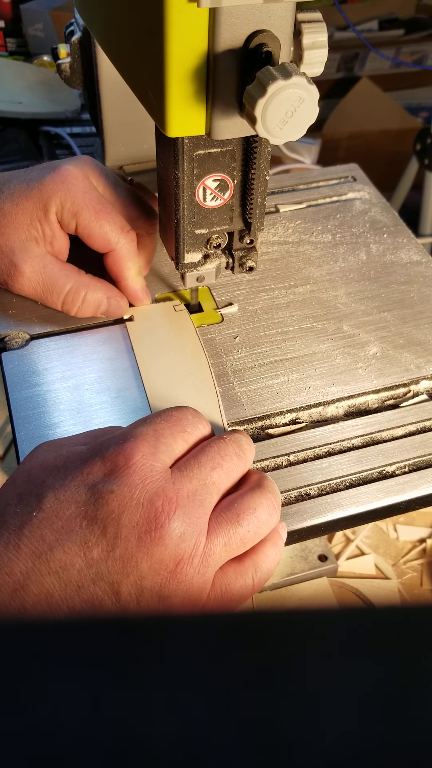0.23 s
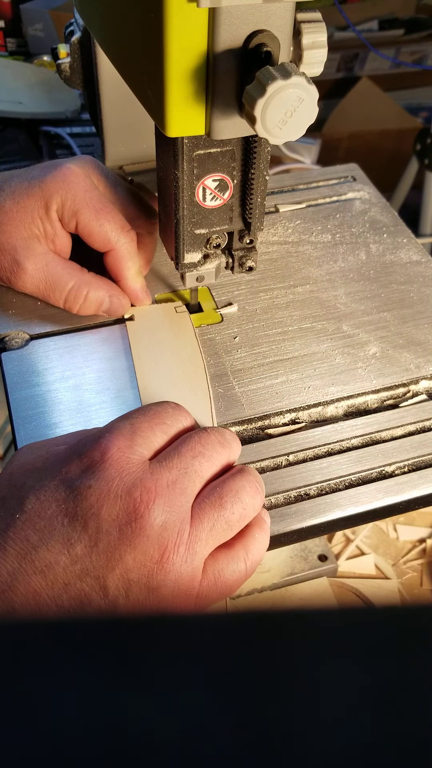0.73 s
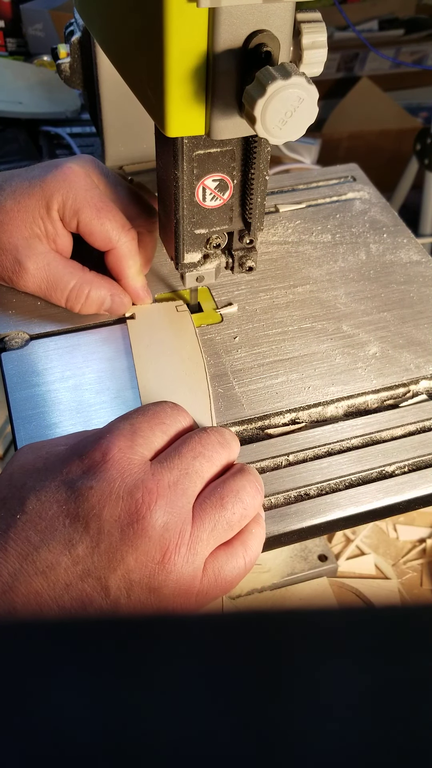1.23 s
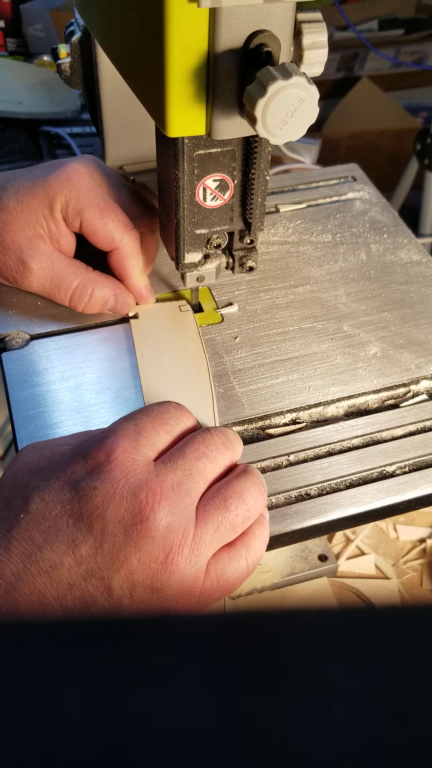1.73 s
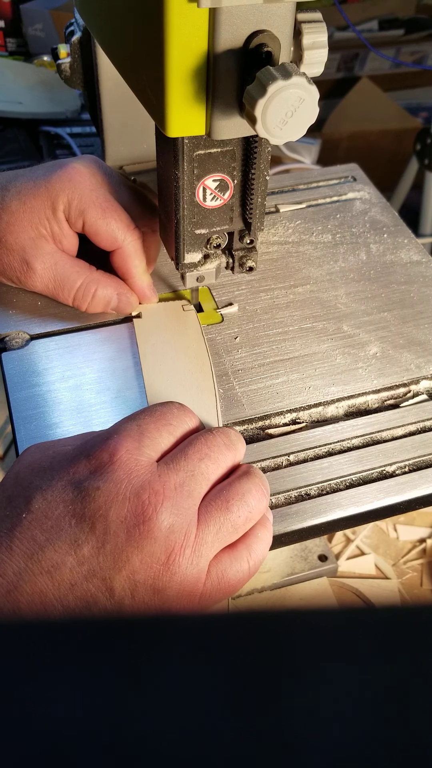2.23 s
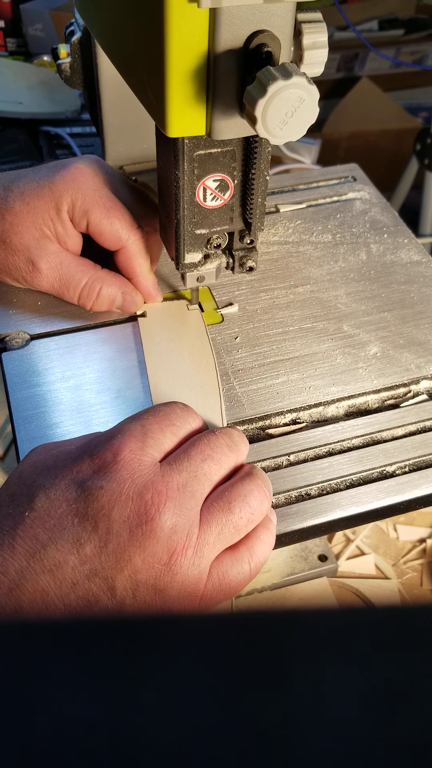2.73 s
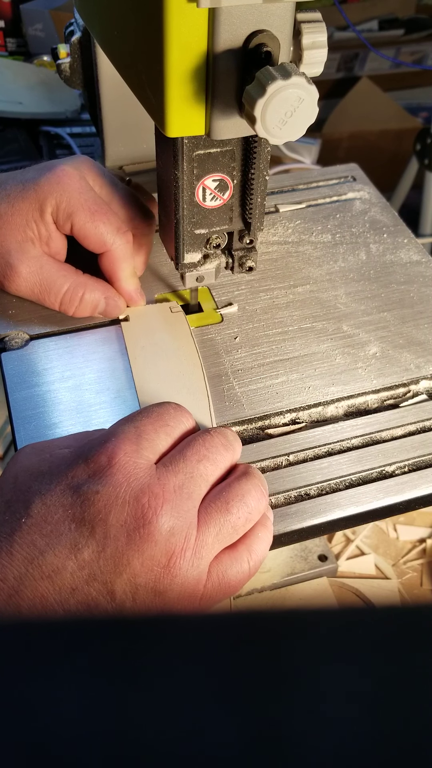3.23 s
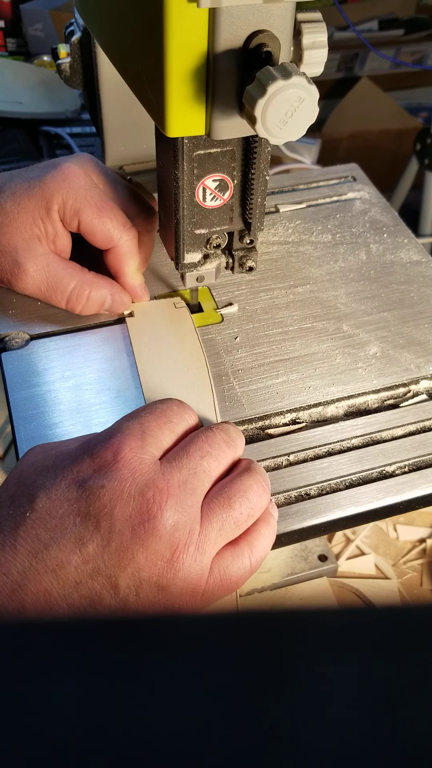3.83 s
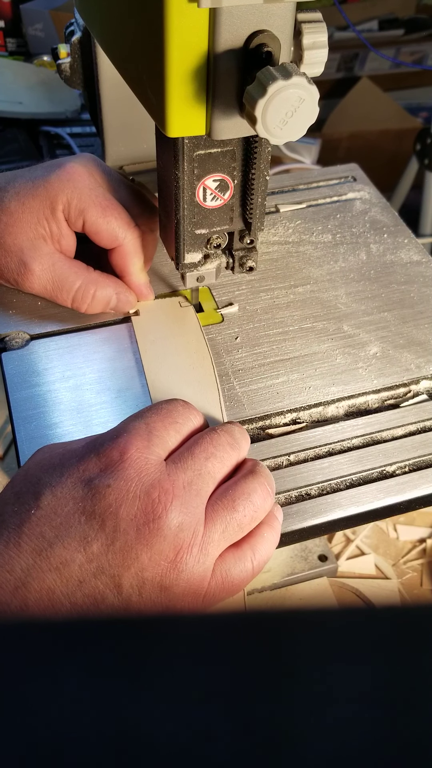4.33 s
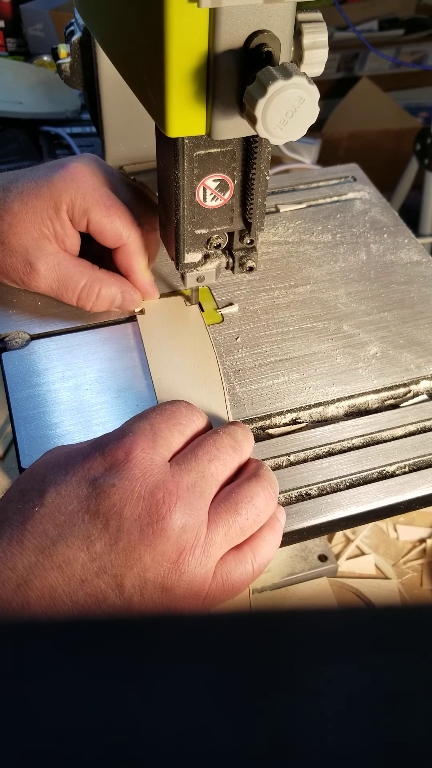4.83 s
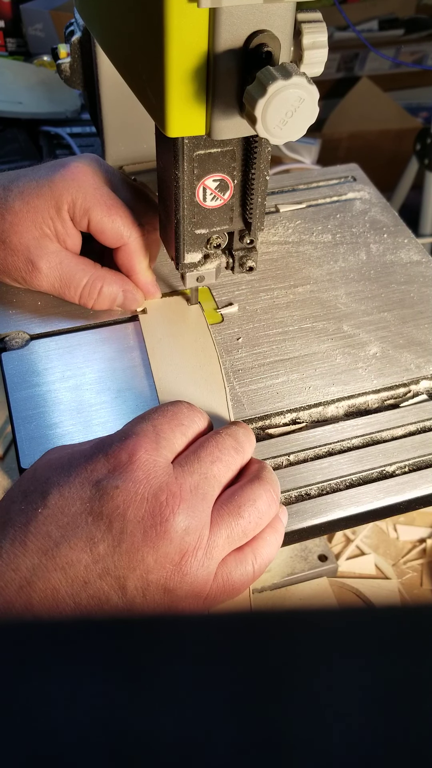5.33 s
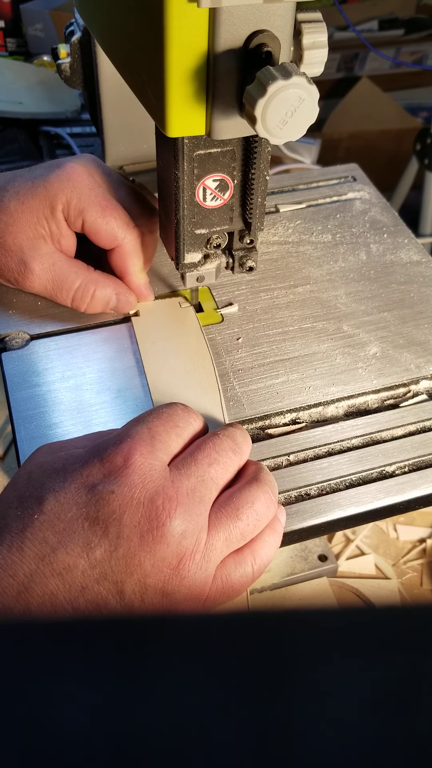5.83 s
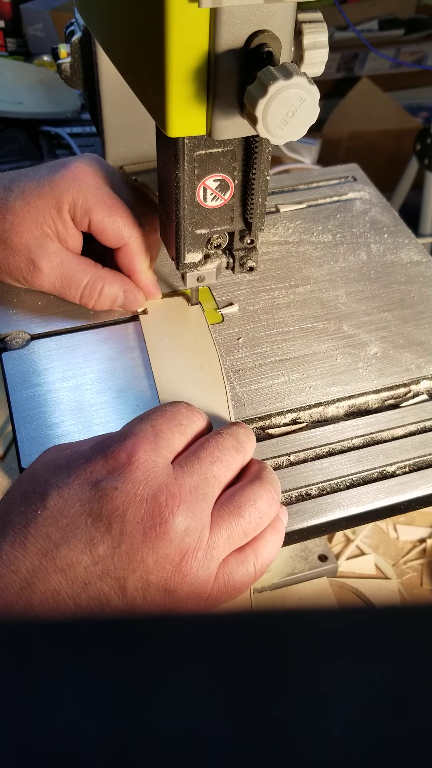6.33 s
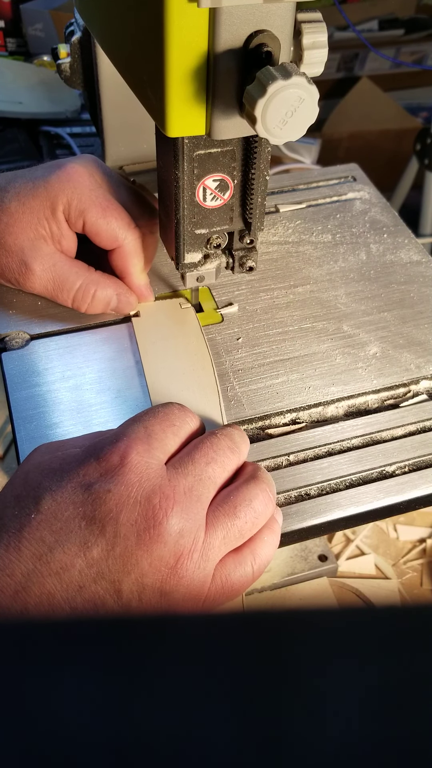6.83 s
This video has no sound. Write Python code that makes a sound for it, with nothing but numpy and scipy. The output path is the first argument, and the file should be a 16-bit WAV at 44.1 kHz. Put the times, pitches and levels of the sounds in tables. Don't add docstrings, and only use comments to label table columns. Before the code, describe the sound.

Benchtop bandsaw idling, with five harsh, buzzing cuts into plywood, dry splinter cracks and light bumps, heard close in a small workshop.

```python
import sys
import numpy as np
from scipy import signal
from scipy.fft import rfft, irfft
from scipy.io import wavfile
from scipy.ndimage import uniform_filter1d

SR = 44100
rng = np.random.default_rng(int(sys.argv[2]) if len(sys.argv) > 2 else 0)


def attenuation_scalar(level_db):
    decades = np.asarray(level_db, float) / 20
    return 10 ** decades


def transcribe(u):
    v = np.clip(np.atleast_2d(u).T, -1, 1)
    q = np.round(v * 32767).astype(np.int16)
    wavfile.write(sys.argv[1], SR, q)


N = 311787
TIME, HZ = np.arange(N) / SR, np.fft.rfftfreq(N, 1 / SR)
BELT_HZ, ROLLER_HZ, TOOTH_HZ = 8.526, 24.52, 2965
LEAD_SAMPLES = 5

# frequency_hz, left_db, right_db
EDGE = [(1260, -16, -23), (1900, -13.5, -28), (2987, 0.5, 3), (3210, -5, -13), (4400, -12.5, -5.5),
        (4850, -8.5, -30.5), (6090, -20.5, -2.5), (7020, -10.5, -15), (7760, -16, -40), (9250, -21.5, -28),
        (11530, -12, -25), (11300, -44, -6), (14700, -3.5, -10), (15300, -37, -12.5)]
CORNER = [(1090, -8, -16), (2080, -4, -16), (2940, 7.5, 6.5), (3550, -1, -3.5), (4450, -10.5, -6),
          (4350, 0.5, 0.5), (5700, -23, -11.5), (7030, -13.5, -10.5), (7700, -12.5, -53),
          (10100, -12.5, -13.5), (11400, -4.5, -15), (11920, -24, 3.5), (13500, -22, -5.5),
          (14300, -1, -11), (14970, -25, -6.5), (15700, -30, -10.5)]
SIDEWAYS = [(1200, -4.5, -12), (1930, -5, -15.5), (2800, 8, 5), (3570, 2, 0), (4200, -0.5, -1),
            (4700, -18, 0.5), (5800, -2, -3), (7000, -3, 1.5), (7900, 4.5, -35), (9550, -17, -9),
            (11300, -8, -20), (11960, -18, 1.5), (13200, -26, -8), (13900, -2, -16), (14800, -27, -9)]
FRESH = [(1220, -16.5, -25), (1910, -14, -23), (2900, -1, -1.5), (3280, 1, -3), (3760, -11.5, -14),
         (4540, -11, -5), (6150, -7, -3.5), (7100, -6.5, -6), (8050, -3, -36), (9450, -10.5, -13),
         (11100, -10, -20), (11900, -14, 0.5), (13100, -26, -12), (13900, -26, -14), (14900, -24, -11)]


def evened(x):
    return x / np.sqrt(np.mean(x ** 2) + 1e-20)


def read(points, hz, axis=1):
    points = np.array(points)
    return np.interp(np.log(hz + 1), np.log(points[:, 0]), points[:, axis])


def drift(seconds):
    size = max(round(seconds * SR), 1)
    smooth = uniform_filter1d(rng.standard_normal(N), size)
    return evened(uniform_filter1d(smooth, size))


def resonate(x, hz, width):
    radius = np.exp(-np.pi * width / SR)
    poles = [1, -2 * radius * np.cos(2 * np.pi * hz / SR), radius * radius]
    return evened(signal.lfilter([1, 0, -1], poles, x))


def dying(events, t60):
    energy = np.zeros(N)
    for start, db in events:
        energy[round(start * SR)] = attenuation_scalar(db) ** 2
    return np.sqrt(signal.lfilter([1], [1, -attenuation_scalar(-60 / (t60 * SR)) ** 2], energy))


def ports(x, left_db, right_db):
    left, right = irfft(rfft(x) * attenuation_scalar([left_db, right_db]), N)
    return evened(np.array([left, np.roll(right, LEAD_SAMPLES)]))


def tinted(x, colour):
    skirt_db = -9 * np.log2(np.maximum(colour[0][0] / (HZ + 10), 1))
    return ports(x, read(colour, HZ, axis=1) + skirt_db, read(colour, HZ, axis=2) + skirt_db)


def throb_db():
    # place_turns, bite_change_db
    spots = [(.07, 2), (.43, -8.5), (.55, 2), (.645, -1.5), (.93, -6)]
    wheel = 4
    for place, db in spots:
        turns_away = (TIME * BELT_HZ - place + .5) % 1 - .5
        wheel = wheel + db * np.exp(-.5 * (turns_away / 0.039) ** 2)
    return wheel + 1.48 * np.cos(2 * np.pi * (ROLLER_HZ * TIME - .43))


def cut(rows, sink, brushes, catches, throb, colour, clean, uneven, rings):
    # frequency_hz, width_hz, level_db
    table_ring = (715, 11, -9.5)
    s, bite_db = np.transpose(rows)
    entry_db, deep_db, sink_s, depth = sink
    inside = (TIME > s[0]) & (TIME < s[-1])
    sinking = np.exp(-np.maximum(TIME - s[0], 0) / sink_s)
    brush_wood_db = -6
    wood_db = np.where(inside, deep_db + (entry_db - deep_db) * sinking, brush_wood_db)

    sets = np.cumsum(TOOTH_HZ / 3 * (1 + .006 * drift(0.003007))) / SR
    teeth = sum((1 if k % 3 == 0 else uneven) * np.cos(2 * np.pi * k * sets) for k in range(1, 16))
    chips = rng.standard_normal(N) * (1 + 0.58 * np.cos(6 * np.pi * sets))
    clumps_db = 2.66 * drift(0.0016) + 1.84 * drift(0.0049)
    rasp = evened((clean * evened(teeth) + evened(chips)) * attenuation_scalar(clumps_db))
    ringing = sum(attenuation_scalar(db) * resonate(rasp, hz, width) for hz, width, db in rings + [table_ring])
    rasp = tinted(rasp + ringing, colour)
    wood = irfft(rfft(rasp) / (1 + (HZ / 4100) ** 12), N)

    push = attenuation_scalar(np.interp(TIME, s, bite_db)) * inside
    for start, db, half in brushes:
        push = np.hypot(push, attenuation_scalar(db) * np.exp(-((TIME - start) / half) ** 2))
    push = push * attenuation_scalar(depth * throb)
    push = np.hypot(push, attenuation_scalar(-8.0) * dying(catches, t60=0.044))
    push = uniform_filter1d(push, size=30)
    return push * (evened(rasp - wood) + attenuation_scalar(wood_db) * evened(wood))


def cuts(throb):
    # time_s, bite_db
    pressure = [
        [(1.69, -42), (1.708, -26), (1.744, -25), (2.406, -27.5), (2.502, -30.5), (2.966, -34.5), (3.006, -37),
         (3.02, -62)],
        [(4.095, -42), (4.1, -21), (4.143, -23.5), (4.651, -31), (4.845, -34.5), (5.047, -35.5), (5.061, -42.5),
         (5.28, -40), (5.36, -76)],
        [(5.364, -41), (5.408, -35.5), (5.418, -22), (5.49, -30), (5.499, -23.5), (5.544, -19.5), (5.55, -39),
         (5.62, -47)],
        [(5.755, -37), (5.765, -32.5), (5.921, -37.5), (6.181, -37), (6.295, -36), (6.333, -46), (6.385, -47),
         (6.42, -76)],
        [(6.735, -34), (6.742, -19.5), (6.752, -27), (6.775, -22), (6.828, -28), (7.07, -28)],
    ]
    # entry_db, deep_db, sink_s, throb_depth_factor
    sinks = [(-1.5, 0, .05, 1.48), (-8.5, -3.5, 0.37, 1.36), (-5.5, -15, 0.082, 0.3), (-9, 3, 0.17, 1.18),
             (-9.5, -1.5, 0.055, 1.11)]
    # time_s, peak_db, half_length_s
    touches = [
        [(1.613, -21.5, 0.0033), (1.675, -45, 0.02)],
        [(4.064, -30, 0.0064), (4.088, -31, .004)],
        [(3.07, -28, 0.026), (3.152, -26, 0.019)],
        [(6.49, -28.5, 0.0025)],
        [(6.727, -28.5, 0.0019)],
    ]
    # time_s, peak_db
    snags = [
        [(1.6097, -41), (1.6467, -6), (1.6761, -3.5), (1.7084, -3), (2.5805, -10), (2.6988, -33), (2.822, -13),
         (2.8744, -31)],
        [(4.0527, -6), (4.0976, -8), (4.3984, -23), (4.4588, -28), (4.7506, -18), (5.0389, -17), (5.1941, -17),
         (5.2784, -18), (5.3163, -18)],
        [(3.1338, -14), (3.0487, -22), (5.525, -11)],
        [(5.7683, -9), (5.9279, -16), (5.9843, -15), (6.1075, -16.5), (6.3799, -26.5)],
        [(6.7364, -11), (6.8568, -25), (6.9144, -23)],
    ]
    # (frequency_hz, width_hz, level_db)
    pieces = [(EDGE, 0.12, 0.093, [(2551, 15, -17), (5935, 45, -12)]),
              (CORNER, 0.27, 0.11, [(14760, 140, -2), (5900, 45, -13.5)]),
              (CORNER, 0.12, 0.25, [(14800, 100, -15)]), (SIDEWAYS, 0.49, 1, [(3144, 47, -13.5),
              (1978, 20, -14), (14800, 120, -6)]), (FRESH, 0.28, 0.18, [(14660, 100, -8), (2860, 54, -19)])]
    moves = zip(pressure, sinks, touches, snags, pieces)
    return sum(cut(rows, sink, brushes, catches, throb, *piece)
               for rows, sink, brushes, catches, piece in moves)


def snaps():
    # start_s, peak_db
    splinters = [(1.8915, -6), (3.0937, -13), (3.148, -10), (3.1603, -3.5), (3.165, -6), (3.178, -26),
                 (4.123, -17), (4.301, -11), (4.408, -16), (5.769, -9), (5.7775, -19), (6.248, -9),
                 (6.258, -17), (6.4895, -12), (6.938, -4)]
    burst = dying(splinters, t60=.003) * rng.standard_normal(N)
    low_cut = 1 + (3500 / (HZ + 1)) ** 4
    high_cut = 1 + (HZ / 9000) ** 2
    crack = irfft(rfft(burst) / low_cut / high_cut, N)
    return np.array([crack, np.roll(crack, LEAD_SAMPLES)])


def machine(throb):
    # time_s, level_db
    hum = [(0.0, -29.5), (0.3, -31), (0.55, -28.5), (1.2, -28), (1.7, -29), (1.8, -32), (2.64, -36),
           (3.21, -40.5), (3.72, -37.5), (4.09, -39), (4.15, -38), (4.8, -42.5), (5.2, -43.5), (5.5, -41.5),
           (5.6, -43.5), (6.26, -41.5), (7.07, -42)]
    orders = [18, 20, 30, 32, 36, 40, 42, 44, 46, 50, 52, 54, 56, 60, 64, 66, 68, 78, 86, 90, 91, 94, 105,
              128]
    orders_db = [-6.5, -17, -7, -12, -4.5, -2.5, -6, -17.5, -8.5, -8, -3, -6.5, -4, -6.5, -0.5, -11, -8,
                 -16, -4, -3.5, -5.5, -7.5, -10, -10]
    # frequency_hz, density_db per Hz
    cabinet = [(15, -60), (25, -23), (80, -25), (114, -12.5), (161, -8), (214, -17), (347, 3), (415, -10.5),
               (553, 0.5), (626, -9.5), (763, -6), (1280, -15.5), (1800, -38), (2340, -31), (3960, -120)]
    # frequency_hz, left_db, right_db
    free_blade = [(1090, -20, 7), (1900, 8.5, -1.5), (3000, 7, 5.5), (3520, -21, 1.5), (3880, 9, -3),
                  (4920, -64.5, 1), (6300, -1, -9.5), (7200, -9, -1), (8040, -38, -34), (9200, -8.5, -83),
                  (10800, -5.5, -17), (12600, -36, 4.5), (14400, 5.5, -6), (15700, -12, 0)]
    # frequency_hz, width_hz, level_db
    guides = [(1671, 70, -15), (2437, 54, -23.5), (3020, 200, -18), (6035, 90, -11), (6450, 52, -29),
              (11040, 69, -24)]
    # frequency_hz, left_minus_right_db
    balance = [(60, -2), (240, 5), (950, 3.5), (3770, 44), (15000, -1.0)]

    beat = attenuation_scalar(-2.5) * (1 + .6 * np.cos(2 * np.pi * 0.694 * (TIME - 1.0)))
    lines = beat * np.sin(2 * np.pi * 119.8 * TIME)
    for order, db in zip(orders, orders_db):
        tone = np.sin(2 * np.pi * (order * BELT_HZ * TIME + rng.random()))
        lines = lines + attenuation_scalar(db + 3.8 * drift(0.26)) * tone
    rumble = evened(irfft(rfft(rng.standard_normal(N)) * attenuation_scalar(read(cabinet, HZ)), N))
    body = attenuation_scalar(-5.5) * evened(lines) + attenuation_scalar(-7 + 0.13 * throb) * rumble

    rub = rng.standard_normal(N) * attenuation_scalar(0.063 * throb + 1.86 * drift(0.0048))
    rings = sum(attenuation_scalar(db) * resonate(rub, hz, width) for hz, width, db in guides)
    whirr = attenuation_scalar(-9.5) * tinted(rub, free_blade) + np.array([rings, np.roll(rings, LEAD_SAMPLES)])
    half_db = read(balance, HZ) / 2
    gain = attenuation_scalar(np.interp(TIME, *np.transpose(hum)))
    return gain * (ports(body, half_db, -half_db) + whirr)


def bumps():
    # time_s, level_db, length_s
    knocks = [(4.304, -45, 0.0032), (5.455, -42, .004), (5.512, -46, 0.002), (5.529, -29.5, 0.0017),
              (5.77, -33, 0.0018), (6.49, -51, .004), (6.765, -35, 0.002)]
    total = np.zeros(N)
    for middle, db, length in knocks:
        u = (TIME - middle) / length
        total += attenuation_scalar(db) * (1 - u ** 2 / 3) * np.exp(-.5 * (u * 2) ** 2)
    return total


def workshop(x, t60=0.11):
    t = np.arange(SR // 3) / SR
    signs = rng.choice([-1., 1.], (2, len(t)))
    sparse = rng.random((2, len(t))) < .05
    taps = signs * sparse * attenuation_scalar(-60 * t / t60) * (t > .003)
    return signal.fftconvolve(x, taps / np.linalg.norm(taps[0]), axes=1)[:, :N]


def scene():
    throb = throb_db()
    saw = cuts(throb) + snaps() + machine(throb)
    return saw + attenuation_scalar(-9.5) * workshop(saw) + bumps()


def band_limit(x):
    return signal.sosfilt(signal.butter(12, 16470, fs=SR, output="sos"), x)


def record(dry):
    held = dry / (1 + dry ** 6) ** (1 / 6)
    lowpass = signal.firwin(601, 15800, window=("kaiser", 9), fs=SR)
    limited = signal.oaconvolve(held, lowpass[None], "same")
    return band_limit(limited)


dry = scene()
out = record(dry)
transcribe(out)
```